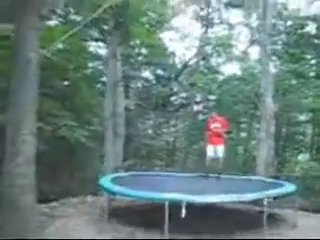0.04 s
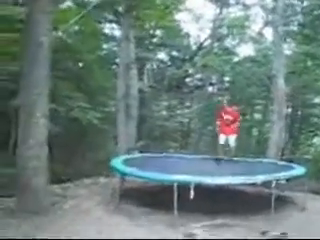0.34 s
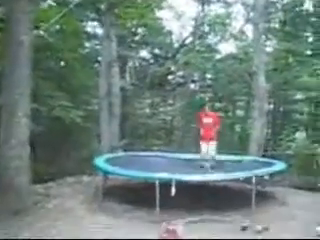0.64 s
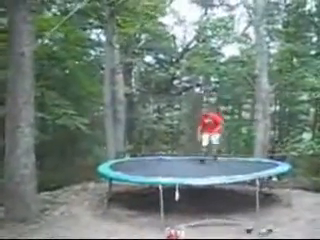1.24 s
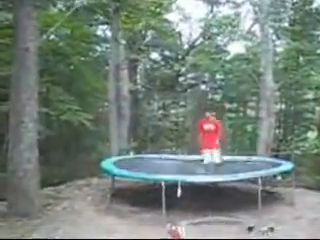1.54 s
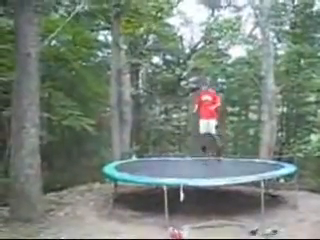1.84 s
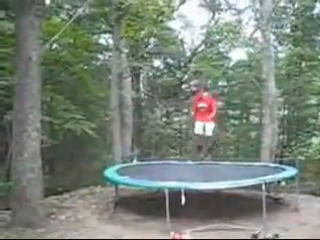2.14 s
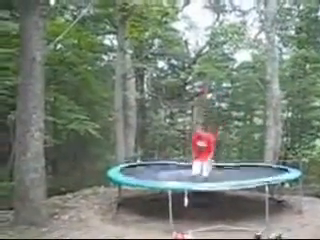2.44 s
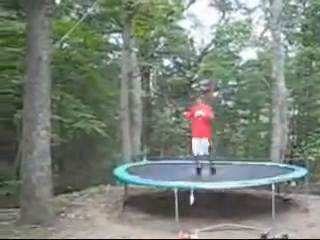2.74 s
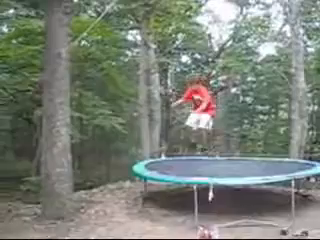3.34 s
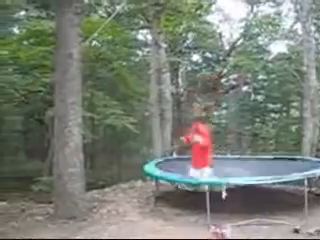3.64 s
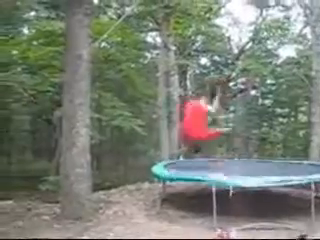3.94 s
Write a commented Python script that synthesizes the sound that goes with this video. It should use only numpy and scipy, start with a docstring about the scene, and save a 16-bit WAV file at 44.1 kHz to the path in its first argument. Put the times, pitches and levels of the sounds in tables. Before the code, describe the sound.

A trampoline creaks under five bounces, several metres off among trees. The steel springs rasp and jingle, the mat thumps softly, and a metal clack comes near the end. A distant rush, low rumble and faint leaf rustle continue behind.

```python
"""A wood, several metres from a garden trampoline; someone bounces about once a second. Mono.
Each landing stretches the steel springs: their hooks rasp, squeak and clack in the frame, and coils
ring. The empty mat swings on and works them again, ever more weakly. The mat thumps; a frame tube
hums once. Behind it: a distant rush, a dying breeze in the leaves, a low drone and a thin whine."""
import sys
import numpy as np
from scipy import signal
from scipy.fft import rfft, irfft, next_fast_len
from scipy.io import wavfile
from scipy.ndimage import map_coordinates

SR = 44100
rng = np.random.default_rng(int(sys.argv[2]) if len(sys.argv) > 2 else 0)


def wrap_up_sound(samples):
    """Save the sound to the file named by the first command line argument, as 16-bit audio."""
    columns = np.atleast_2d(samples).T
    # keep every value between -1 and 1, then stretch to whole-number steps
    tamed = np.clip(columns, -1, 1)
    steps = np.round(tamed * 32767).astype(np.int16)
    wavfile.write(sys.argv[1], SR, steps)


N = 176400

# Distant rush spectrum (frequency [Hz], gain [dB])
RUSH_SPECTRUM = [(76, -40.5), (130, -9.5), (156, -8.5), (188, -3), (409, -7), (554, -2.5), (623, -1),
                 (713, 2), (888, -1), (1030, 0.5), (2240, -21.5), (3040, -23.5), (4190, -25.5),
                 (5670, -24.5), (7300, -33), (9490, -76), (16100, -120)]
# Distant rush envelope (time [s], level [dB])
RUSH_ENVELOPE = [(0.0, -39.5), (0.78, -39), (1.32, -41), (1.74, -40.5), (2.23, -40), (2.74, -39),
                 (3.25, -41), (3.46, -40), (3.72, -38.5), (4.0, -38.5)]
# Leaf rustle spectrum (frequency [Hz], gain [dB])
LEAF_SPECTRUM = [(900, -32), (2000, 3.5), (3000, 5.5), (5000, -4.5), (6500, -2.5), (7300, -10.5)]
# Low rumble spectrum (frequency [Hz], gain [dB])
RUMBLE_SPECTRUM = [(18, -35), (28, -12), (40, 2.5), (55, -5.5), (70, -2), (82, -1), (98, -4.5), (130, -7),
                   (200, -15), (400, -56)]
# Air pushed by the mat (time [s], half width [s], level [dB])
MAT_THUMPS = [(.4, .02, -48), (1.12, 0.018, -46), (1.679, 0.059, -46), (2.673, 0.03, -42),
              (2.809, 0.029, -41), (3.244, 0.028, -47), (3.69, 0.027, -45.5), (3.847, 0.15, -45.5)]
# Mat thump spectrum (frequency [Hz], gain [dB])
THUMP_SPECTRUM = [(20, -9), (40, -4.5), (80, -3), (130, -3), (200, -6.5), (320, -16.5), (700, -41.5)]
# Frame tube modes (frequency [Hz], gain [dB], T60 [s])
TUBE_MODES = [(213.3, 5, 0.35), (432, -9, .3), (657, -18, 0.33)]
# Hook impacts (time [s], level [dB])
HOOK_CLACKS = [(3.747, -25), (3.7612, -35), (3.766, -40)]
# Hook impact spectrum (frequency [Hz], gain [dB])
CLACK_SPECTRUM = [(300, -37), (900, -4), (1400, -6), (2000, 2), (2800, 0), (3800, 0), (5000, -6),
                  (7300, -19)]
# Hook rasp spectrum (frequency [Hz], gain [dB])
RASP_SPECTRUM = [(880, -38.5), (1500, -20), (1740, -11.5), (2010, -0.5), (2580, -4.5), (3480, -1),
                 (3740, -3.5), (4300, -5), (4720, -7.5), (5710, -11.5), (6740, -8.5), (7020, -10),
                 (7300, -21.5), (9490, -40.5), (16100, -120)]
# Spring resonances (frequency [Hz], bandwidth [Hz], gain [dB])
SPRING_MODES = [(1990, 53, 2.5), (2300, 47, -8), (3055, 32, 8.5), (3296, 74, -2), (4630, 30, -2),
                (4880, 41, -5), (5300, 140, -13), (6450, 76, -8.5), (6260, 71, -11.5), (6700, 30, -6)]
# Frame and mat response (frequency [Hz], gain [dB])
BODY_SPECTRUM = [(100, -21.5), (400, -17.5), (750, -11.5), (1100, 6), (1350, 6), (1700, -6.5), (2500, -32)]
# Hook squeaks (time [s], half width [s], pitch [Hz], level [dB], tilt [dB/harmonic])
HOOK_SQUEAKS = [(0.642, 0.016, 2015, -36.5, -8), (1.048, .012, 1997, -53, 0),
                (2.14, 0.0057, 2436, -47.5, 6), (3.224, 0.0055, 1920, -39, 0)]
# Squeak harmonics (multiple of pitch, gain before tilt [dB])
SQUEAK_HARMONICS = [(1, -5), (2, -14.5), (3, -20)]
# Rasp filter for slack springs (frequency [Hz], gain [dB])
SLACK_SPECTRUM = [(1500, -2.5), (2200, -1), (3200, -2), (4400, -1), (5500, -3), (7000, -0.5)]
# Landings (touchdown [s], deepest stretch [s], level [dB], rise [s], fall [s], rebound delay [s],
# rebound period [s], first rebound gain [dB], first rebound half width [s])
LANDINGS = [(-.3, -0.147, -36.5, .08, 0.029, 0.23, 0.17, -5.5, 0.057),
            (0.554, 0.727, -37.5, 0.097, 0.042, 0.19, 0.16, -4, 0.057),
            (1.469, 1.621, -36.5, 0.067, 0.058, 0.22, .165, -3.5, 0.057),
            (2.522, 2.687, -33, 0.1, 0.055, 0.2, 0.2, -5, 0.089),
            (3.68, 3.796, -33, .052, 0.061, 0.17, .17, -6.5, 0.055)]


def amp(db):
    """Decibels to gain."""
    return 10 ** (np.asarray(db) / 20)


def unit(x):
    """Scale to rms 1."""
    return x / np.sqrt(np.mean(x ** 2) + 1e-20)


def clock():
    """Sample times [s]."""
    return np.arange(N) / SR


def noise():
    """White noise."""
    return rng.standard_normal(N)


def wobble(knots_per_s):
    """Smooth random curve."""
    knots = rng.standard_normal(int(N * knots_per_s / SR) + 4)
    return map_coordinates(knots, [clock() * knots_per_s])


def filtered(x, response):
    """Apply a gain given as a function of frequency [Hz]."""
    size = next_fast_len(N + SR // 2)
    return irfft(rfft(x, size) * response(np.fft.rfftfreq(size, 1 / SR)), size)[:N]


def coloured(x, spectrum):
    """Filter by a spectrum table; rms 1."""
    hz, db = np.transpose(spectrum)
    return unit(filtered(x, lambda f: amp(np.interp(np.log(f + 1), np.log(hz + 1), db))))


def resonate(x, modes):
    """Parallel band-pass resonators; rms 1."""
    def response(f):
        return sum(amp(db) * 1j * f * width_hz / (hz * hz - f * f + 1j * f * width_hz)
                   for hz, width_hz, db in modes)
    return unit(filtered(x, response))


def swell(peak_s, rise_s, fall_s):
    """Gaussian envelope with separate rise and fall."""
    t = clock() - peak_s
    return np.exp(-.5 * (t / np.where(t < 0, rise_s, fall_s)) ** 2)


def distant_rush():
    """Broad noise, level drifting slightly."""
    level_db = np.interp(clock(), *np.transpose(RUSH_ENVELOPE))
    return amp(level_db) * coloured(noise(), RUSH_SPECTRUM)


def drone(hz=83, width_hz=16, level_db=-51.5):
    """Narrow noise band, heard as a low fluttering tone."""
    band = filtered(noise(), lambda f: 1 / (1 + ((f - hz) / width_hz) ** 2) ** 2)
    return amp(level_db) * unit(band)


def whine(hz=5480, jitter_hz=32, level_db=-68):
    """Faint high tone, pitch jittering."""
    pitch_hz = hz + jitter_hz * wobble(150)
    return amp(level_db) * unit(np.sin(2 * np.pi * np.cumsum(pitch_hz) / SR))


def leaves(start_db=-56.5, fade_db_per_s=3.5):
    """A dying breeze rustles the leaves."""
    return amp(start_db - fade_db_per_s * clock()) * coloured(noise(), LEAF_SPECTRUM)


def rumble(level_db=-45.5):
    """Steady low noise."""
    return amp(level_db) * coloured(noise(), RUMBLE_SPECTRUM)


def trunk_echo(x, t60_s=.77, gain_db=-8):
    """Trunks scatter a short echo."""
    t = np.arange(SR // 2) / SR
    tail = rng.standard_normal(len(t)) * amp(-60 * t / t60_s)
    return amp(gain_db) * signal.fftconvolve(x, tail / np.linalg.norm(tail))[:N]


def mat_thumps():
    """The moving mat pushes air in soft low thumps."""
    envelope = sum(amp(db) * swell(at_s, half_s, half_s) for at_s, half_s, db in MAT_THUMPS)
    return envelope * coloured(noise(), THUMP_SPECTRUM)


def frame_tube(knock_s=1.577, gain_db=-33.5, attack_s=.003, hold_s=.078, release_s=.0069):
    """A tube, knocked through the soft pad, hums until the load comes off."""
    t = np.maximum(clock() - knock_s, 0)
    ring = sum(amp(db - 60 * t / t60_s) * np.sin(2 * np.pi * hz * t) for hz, db, t60_s in TUBE_MODES)
    attack = 1 - np.exp(-t / attack_s)
    release = np.exp(-np.maximum(t - hold_s, 0) / release_s)
    return amp(gain_db) * ring * attack * release


def hook_clacks(t60_s=.058):
    """A landing near the edge snaps the hooks against the frame."""
    t = clock()
    envelope = sum(amp(db - 60 * np.abs(t - at_s) / t60_s) * (t >= at_s) for at_s, db in HOOK_CLACKS)
    return envelope * coloured(noise(), CLACK_SPECTRUM)


def hook_friction(slips_per_s=2500, spread_db=1.5, slip_share=.53):
    """Stick-slip of steel hooks: tiny impulses over a fine hiss."""
    slipping = rng.random(N) < slips_per_s / SR
    slips = slipping * np.sign(noise()) * amp(spread_db * noise())
    return np.sqrt(slip_share) * unit(slips) + np.sqrt(1 - slip_share) * noise()


def coil_jingle(rings_per_s=240, centre_hz=4212, log_spread=.54, spread_db=10, t60_s=.09):
    """Single coils ring briefly, each at its own pitch."""
    count = int(rings_per_s * N / SR)
    start, pitch, strength = rng.random((count, 3)).T[:, :, None]
    t = np.arange(SR // 12) / SR
    hz = centre_hz * np.exp(log_spread * (2 * pitch - 1))
    rings = amp(spread_db * (2 * strength - 1) - 60 * t / t60_s) * np.sin(2 * np.pi * hz * t)
    index = (start * N).astype(int) + np.arange(len(t))
    summed = np.bincount(index.ravel(), rings.ravel(), N)[:N]
    return coloured(summed, RASP_SPECTRUM)


def hook_rasp(spring_db=-11, jingle_db=-7, body_db=-5, judder_db=.73):
    """Friction sounds directly and rings the springs, frame and mat."""
    friction = hook_friction()
    direct = coloured(friction, RASP_SPECTRUM)
    ring = amp(spring_db) * resonate(hook_friction(), SPRING_MODES)
    jingle = amp(jingle_db) * coil_jingle()
    body = amp(body_db) * coloured(friction, BODY_SPECTRUM)
    return (direct + ring + jingle + body) * amp(judder_db * wobble(76))


def hook_squeaks(pitch_jitter=.03, rasp_db=-6.5):
    """A hook slips periodically and sings for a moment."""
    out = np.zeros(N)
    scrape = amp(rasp_db) * unit(hook_rasp())
    for at_s, half_s, hz, level_db, tilt_db in HOOK_SQUEAKS:
        phase = 2 * np.pi * np.cumsum(hz * (1 + pitch_jitter * wobble(500))) / SR
        tone = sum(amp(db + tilt_db * (k - 1)) * np.sin(k * phase) for k, db in SQUEAK_HARMONICS)
        out += amp(level_db) * swell(at_s, half_s, half_s) * (unit(tone) + scrape)
    return out


def springs(settle_s=.012, touch_db=-10, rebounds=3, loss_db=2.5, loss_growth_db=2.36, width_ratio=.92):
    """Rasp follows stretch: one swell under the jumper, then dying swings of the empty mat."""
    loaded_power, rebound_power = np.zeros(N), np.zeros(N)
    for touch_s, peak_s, level_db, rise_s, fall_s, delay_s, period_s, rebound_db, width_s in LANDINGS:
        contact = np.clip((clock() - touch_s) / settle_s, 0, 1)
        stretch = np.maximum(swell(peak_s, rise_s, fall_s), amp(touch_db) * (clock() < peak_s))
        loaded_power += (amp(level_db) * contact * stretch) ** 2
        for k in range(rebounds):
            swing_db = level_db + rebound_db - loss_db * k - loss_growth_db * k * k
            half_s = width_s * width_ratio ** k
            swing = swell(peak_s + delay_s + k * period_s, half_s, half_s)
            rebound_power += (amp(swing_db) * swing) ** 2
    loaded = np.sqrt(loaded_power) * unit(hook_rasp())
    slack = np.sqrt(rebound_power) * coloured(hook_rasp(), SLACK_SPECTRUM)
    return loaded + slack


def scene():
    """Trampoline among trees; both channels equal."""
    steel = springs() + hook_squeaks() + hook_clacks()
    trampoline = steel + trunk_echo(steel) + frame_tube() + mat_thumps()
    background = distant_rush() + drone() + whine() + leaves() + rumble()
    mono = trampoline + background
    return np.array([mono, mono])


def record(dry):
    """Steep low-pass band limit."""
    cutoff_hz, edge_hz = 7400, 200
    return np.array([filtered(x, lambda f: np.clip((cutoff_hz - f) / edge_hz + .5, 0, 1)) for x in dry])


dry = scene()
out = record(dry)
wrap_up_sound(out)
```